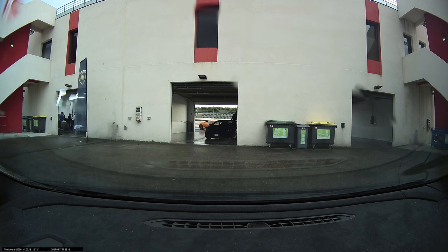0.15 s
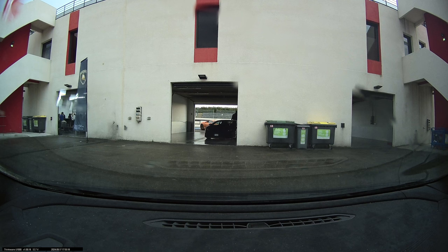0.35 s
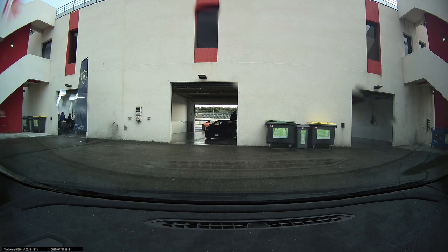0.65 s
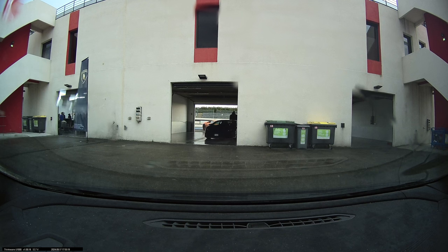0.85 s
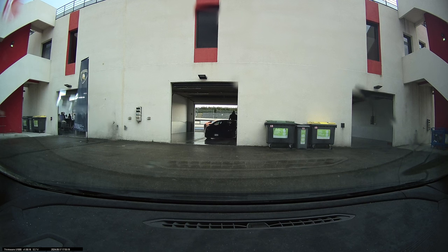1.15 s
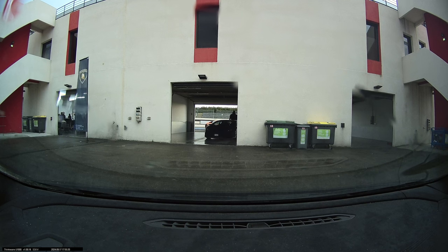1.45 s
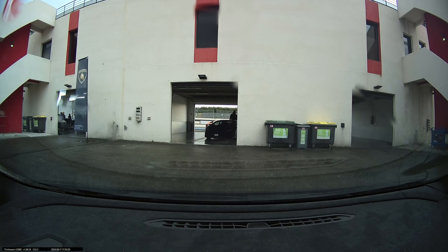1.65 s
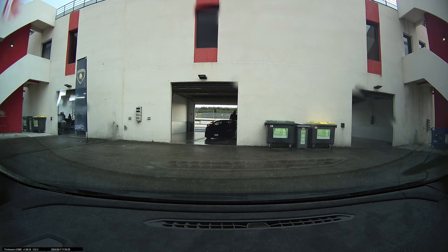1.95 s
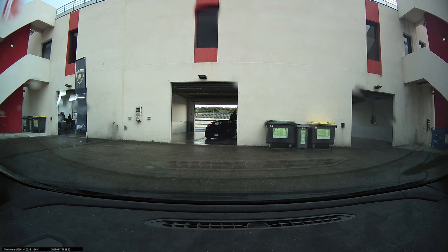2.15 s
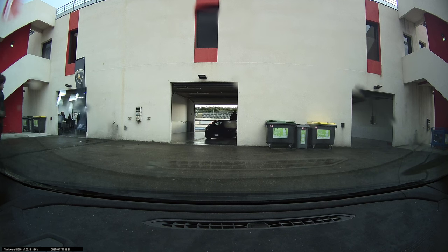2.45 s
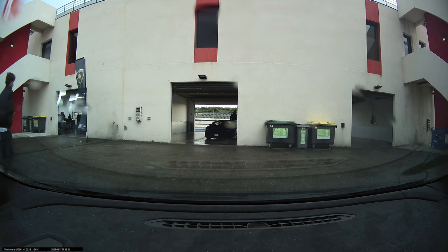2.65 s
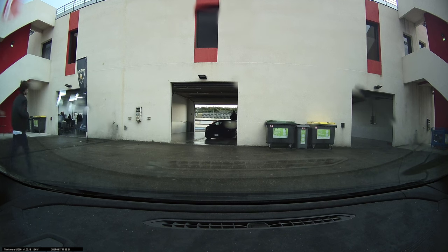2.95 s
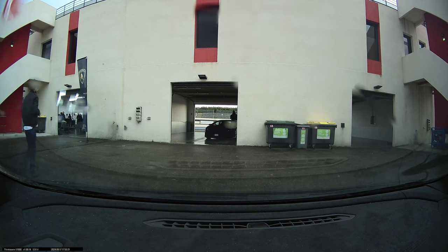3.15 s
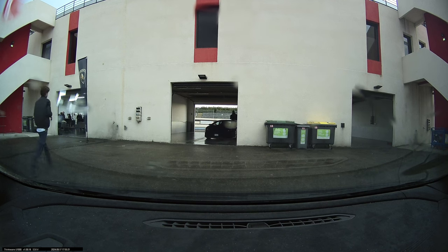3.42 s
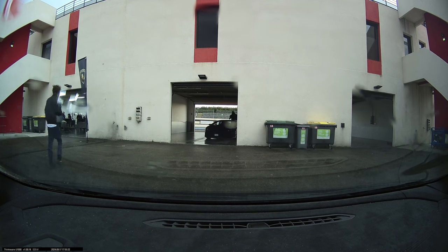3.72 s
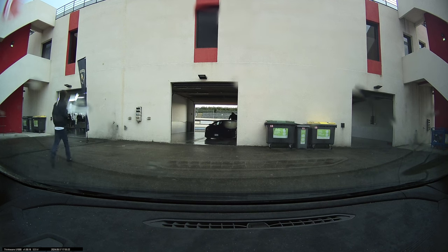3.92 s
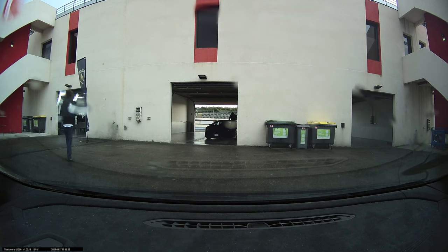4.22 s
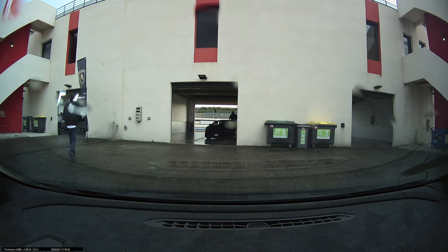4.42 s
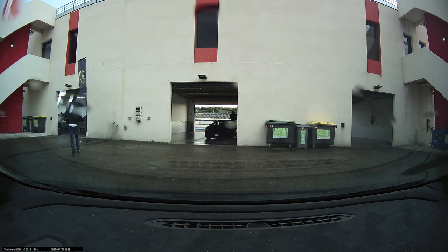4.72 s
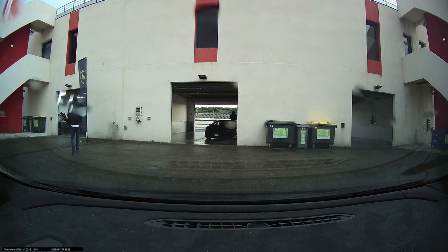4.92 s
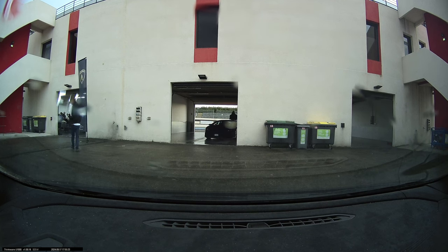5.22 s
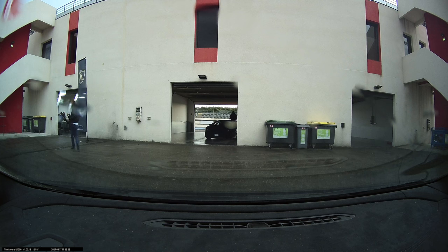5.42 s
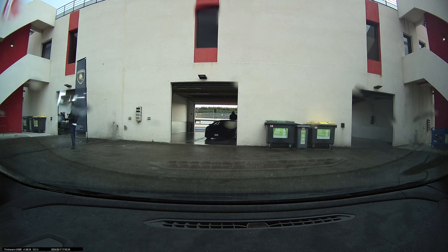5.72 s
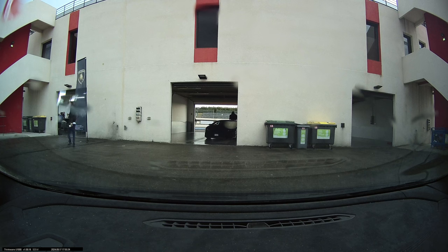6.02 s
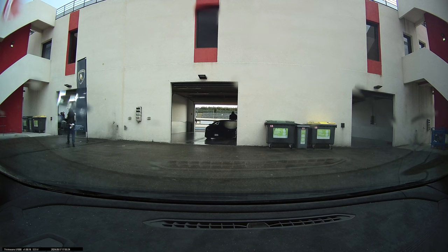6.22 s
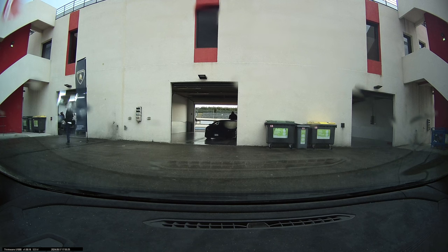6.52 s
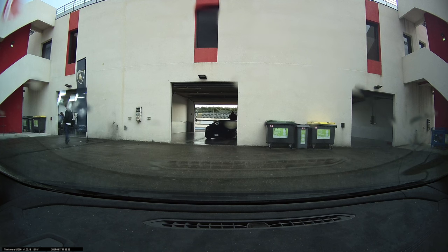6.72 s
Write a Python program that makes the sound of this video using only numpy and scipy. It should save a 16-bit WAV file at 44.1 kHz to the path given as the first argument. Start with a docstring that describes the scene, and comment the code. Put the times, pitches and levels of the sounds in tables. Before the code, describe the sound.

Close inside a parked car, with the microphone on the dashboard. Faint outside hum and light rain come first, with small body bumps. A brief hinge squeak leads into a massive, clipped door slam with rattles and low pressure throbs. Outside noise vanishes, a window motor grinds briefly, then rain ticks quietly until the locks thunk and a relay clicks in two pairs.

```python
"""A car door slams in light rain

Heard from the dashboard of a parked car: a door swings on a squeaking hinge, a gliding narrow band of noise, and slams.
The slam sets slow pressure waves ringing, which overload the microphone, and shaped noise makes the knocks and rattles.
Wavering tones and noise from outside fade as the door shuts, then a window motor grinds as uneven noise.
Later the locks thunk and a relay, a set of ringing tones, ticks twice over. Short noise ticks of rain fall throughout.
"""
import sys
import numpy as np
from scipy import signal
from scipy.fft import rfft, irfft, next_fast_len
from scipy.io import wavfile

SR = 44100
rng = np.random.default_rng(int(sys.argv[2]) if len(sys.argv) > 2 else 0)


def boost(x):
    """Linear amplitude factor 10**(x/20) for a level x in decibels (scalar or array-like)."""
    u = np.asarray(x, float) / 20
    return 10 ** u


def file_out(sig):
    """Save sig as 16-bit WAV at sys.argv[1]."""
    # one column per channel
    cols = np.atleast_2d(sig).T
    # limit, then scale
    lim = np.clip(cols, -1, 1)
    pcm = np.round(lim * 32767).astype(np.int16)
    wavfile.write(sys.argv[1], SR, pcm)


N = 302885
T = np.arange(N) / SR  # time of every sample, in seconds

# In all tables, "fade" is the time in which a sound dies away by 60 dB.
# A "colour" is the balance of a noise. Each row: frequency in Hz, relative level in dB.

# Booms of the car body when it is jolted. Each row: start in seconds, level in dB, fade in seconds.
BODY_JOLTS = [(.01, -47.5, 0.53), (.2, -51, 1), (.39, -48.5, 0.33), (0.614, -32, 0.31), (.69, -34.5, 0.34),
              (.83, -42, 0.34), (.95, -46.5, 1), (1.57, -33, .15), (1.645, -42.5, 0.68), (1.8, -41, 0.14),
              (1.925, -51.5, 0.32)]
# Colour of those booms.
BOOM_COLOUR = [(10, -31), (20, 11), (33, 11.5), (45, 5), (75, -21), (100, -67.5)]
# Colour of the closed cabin and microphone hiss.
FLOOR_COLOUR = [(12, -31.5), (20, 5), (53, -0.5), (197, -3.5), (260, -9.5), (537, -13), (635, -10.5),
                (710, -15), (992, -16.5), (1110, -21.5), (2360, -30), (3580, -31), (5290, -37.5),
                (12600, -40), (15700, -41)]
# Faint electronic whines that fade around the locking. Each row: time in seconds, level in dB.
WHINE_LEVEL = [(0, -93.5), (2.5, -93.5), (3.6, -92), (4.2, -105)]
# Swells of the outside hum. Each row: centre in seconds, half length in seconds, pitch in Hz, level in dB
# before the wavering.
HUM_SWELLS = [(0.11, .17, 208.7, -60), (0.364, 0.076, 207.6, -50.5), (0.498, 0.099, 209, -60),
              (0.847, .13, 212, -61), (1.06, .1, 212.3, -66), (3.401, .25, 233.9, -67)]
# Street noise through the open door. Each row: time in seconds, level in dB.
STREET_LEVEL = [(0.0, -64.5), (0.546, -69.5), (0.984, -73.5), (1.14, -88)]
# Colour of the street noise.
STREET_COLOUR = [(160, -29), (280, 5), (338, -12), (420, 1), (465, -6.5), (1020, -9.5), (2580, -23),
                 (3660, -20), (5340, -36), (9000, -37), (11700, -66.5), (19800, -120)]
# The larger raindrops. Each row: start in seconds, level in dB before each layer's own offset,
# glassy part in dB relative to that level.
LARGE_DROPS = [(0.357, -43.5, -33), (0.468, -56.5, -7), (0.614, -49.5, -6.5), (0.74, -49.5, -9),
               (0.812, -60, -12), (0.873, -53, -7), (1.079, -56, -8), (2.017, -46.5, -18),
               (2.042, -49, -18), (2.178, -50.5, -10.5), (2.254, -54, -18), (2.323, -51.5, -18),
               (2.544, -54.5, -7), (2.864, -43.5, -12), (2.983, -51, -11), (3.052, -53.5, -14),
               (3.075, -47, -25), (3.254, -51.5, -20), (3.304, -52.5, -9), (3.324, -53.5, -8),
               (3.359, -51, -28), (3.744, -52.5, -16), (3.774, -48.5, -11), (3.911, -48.5, -7.5),
               (3.99, -60, 0), (4.121, -61, -9), (4.148, -49.5, -5), (4.26, -53.5, -27.5),
               (4.424, -46.5, -18.5), (4.505, -56, -13), (4.66, -52, -20), (4.795, -50, -13),
               (4.898, -50.5, -7.5), (5.13, -49.5, -17), (5.154, -50, -10), (5.237, -57.5, -13),
               (5.303, -52, -19.5), (5.367, -51.5, -16.5), (5.439, -41.5, -8.5), (5.623, -50.5, -9),
               (5.642, -53, -2.5), (5.69, -55, -12), (5.849, -58.5, -30), (6.379, -53.5, -32.5),
               (6.841, -53.5, -7)]
# Colour of drops on the roof.
ROOF_COLOUR = [(180, -31.5), (300, -4), (857, 0), (1220, -1), (2690, -13.5), (3130, -17), (4610, -25.5),
               (7320, -29), (8160, -40.5), (10900, -41.5), (12000, -38), (15600, -84), (22000, -120)]
# Colour of drops on the glass.
GLASS_COLOUR = [(1500, -38.5), (2800, -14), (3600, 6), (5000, -7.5), (8000, -17), (11000, -41)]
# Colour of the trim, which rattles with the locks and relay and rings under the drops.
TRIM_COLOUR = [(240, -32.5), (400, -4.5), (563, -6.5), (850, -2), (1250, -9), (1460, -5), (1730, -11.5),
               (2270, -15), (2540, -22), (3240, -13.5), (4250, -30.5), (12000, -60), (15600, -89),
               (22000, -120)]
# Knocks of door, trim and lock. Each row: start in seconds, rattle level in dB, knock level in dB,
# thud level in dB, fade of the rattle in seconds.
KNOCK_EVENTS = [(0.64, -58, -50, -66, 0.21), (0.673, -55, -62, -48, 0.14), (1.1475, -43, -40, -68, 0.5),
                (1.198, -21, -45.5, -41.5, 0.11), (1.2443, -34.5, -27.5, -47, 0.02),
                (1.2551, -33, -27, -40, 0.046), (1.279, -45.5, -36, -25, 0.11),
                (1.33, -64, -58.5, -36, 0.3), (1.379, -58, -56, -44, 0.038),
                (1.4194, -48, -42.5, -42, 0.11), (1.483, -64, -60, -50, 0.077),
                (1.53, -63, -43.5, -43.5, 0.092), (1.583, -59, -53.5, -45, 0.19),
                (1.81, -62, -61.5, -45.5, 0.14), (3.640, -33, -33, -47.5, 0.12),
                (3.877, -51.5, -58.5, -71, 0.14), (3.957, -62, -52.5, -48, 0.5),
                (4.025, -57.5, -63, -41, 0.23), (4.064, -54, -40.5, -47, 0.089),
                (4.109, -68.5, -69, -48.5, 0.077), (5.926, -48.5, -54.5, -61, 0.11),
                (6.176, -51.5, -58, -65, 0.1)]
# Parts that slide before or between the knocks. Each row: start in seconds, level in dB, fade in seconds.
SLIDING_PARTS = [(0.339, -55.5, 0.22), (.626, -60, 0.19), (3.621, -47.5, .03), (3.811, -61.5, 0.13),
                 (6.128, -63, 0.086)]
# Colour of the door's rattles.
DOOR_COLOUR = [(240, -31), (400, -4), (481, -8), (900, -4.5), (1280, -18.5), (1640, -11.5), (2470, -27),
               (3380, -21.5), (4310, -44), (6890, -55), (12000, -66), (15600, -89), (22000, -120)]
# Colour of the knocks on the panels.
PANEL_COLOUR = [(120, -40), (190, 2), (280, 4), (380, -4), (520, -7), (700, -66)]
# Colour of the thuds.
THUD_COLOUR = [(40, -40), (65, -0.5), (90, -3.5), (135, -2), (200, -8), (280, -21), (400, -76.5)]
# Path of the hinge squeak. Each row: time in seconds, pitch in Hz, level in dB shared by its layers.
HINGE_SQUEAK = [(.88, 14050, -81), (.897, 11860, -75), (.907, 9000, -76), (.913, 8100, -66),
                (.958, 7500, -63.5), (.97, 6450, -60), (.982, 7800, -59), (1.022, 10800, -67.5),
                (1.035, 12900, -69), (1.05, 13100, -87)]
# Resonances of the door skin woken by the squeak. Each row: frequency in Hz, level in dB at the hardest rub.
DOOR_SKIN = [(3550, -60), (4900, -73), (7800, -72), (10500, -67), (11200, -79), (13500, -78)]
# Air and body modes (natural vibrations) of the cabin. Each row: frequency in Hz, fade in seconds.
CABIN_MODES = [(6.12, .16), (35.1, .17), (37.94, .77), (68.81, .17)]
# The slam, its rebound off the seal and its settling. Each row: start in seconds, then the signed push into
# each of the four cabin modes, where 1 is full scale.
SLAM_BLOWS = [(1.1988, 6.57, 1.41, .08, -1.33), (1.2622, -2.1, -.52, -.19, -.53),
              (1.2854, 1.12, .84, .04, -.21)]
# Colour of the latch striking home.
LATCH_COLOUR = [(710, -29.5), (1200, 0), (3110, 1), (4180, -33.5), (5000, -15.5), (6940, -26), (15000, -51)]
# Load on the window motor. Each row: time in seconds, level in dB of its grinding.
MOTOR_LOAD = [(1.47, -67), (1.526, -58), (1.598, -59.5), (1.686, -49.5), (1.73, -57.5), (1.79, -54),
              (1.845, -58), (1.92, -73)]
# Colour of the motor.
MOTOR_COLOUR = [(180, -36.5), (300, -16), (410, -1), (466, -10), (569, -1.5), (638, -7.5), (801, -2),
                (1230, -9), (1340, -3), (1850, -17), (3520, -23), (5320, -35.5), (9000, -43), (11700, -81),
                (19800, -120)]
# The relay closes and opens in turn. Each row: start in seconds, level in dB before each layer's own offset.
RELAY_TICKS = [(3.846, -31.5), (4.032, -31), (6.048, -32), (6.235, -31.5)]
# Modes of the relay housing. Each row: frequency in Hz, relative level in dB on closing,
# relative level in dB on opening, fade in seconds.
RELAY_HOUSING = [(554, -0.5, -0.5, 0.043), (817, -7, 9, 0.065), (1287, 10, 3.5, 0.045),
                 (2384, -11.5, -29, 0.07), (2645, -13, -5, 0.059), (3600, -7, -41, 0.072),
                 (4800, -22, -27, 0.048)]

JOLT_RISE_S = 0.054
WHINE_SAG_HZ_PER_S = 66
PATTER_PER_S = 70  # small raindrops
PATTER_OPEN_DB, PATTER_SHUT_DB = -63, -68  # base level of small drops with the window open and shut
FLURRY_DB = 3.5  # how strongly the small drops come in flurries
# A knock of HARD_DB rises in HARD_RISE_S; the rise time grows by SOFTEN dB per dB weaker.
HARD_RISE_S, HARD_DB, SOFTEN = 0.0013, -30, 0.27
SCRAPE_RISE_S = 0.013
LOCKING_S = 3  # the door rattles before this time, the locks after
RUB_S, RUB_HALF_S = 0.962, 0.018  # the hardest rub of the hinge and its half length
NEAR_HZ, NEAR_DB = 500, -1  # a skin mode also answers when the squeak passes this near
OVERLOAD = 0.4855  # microphone limit, where 1 is full scale


def unit(x):
    """Scale to an rms (average strength) of 1."""
    return x / np.sqrt(np.mean(x ** 2) + 1e-20)


def curves(rows):
    """One value per sample for each column after the time; the last, a level, fades out beyond the rows."""
    s, *columns = np.transpose(rows)
    beyond_s = np.maximum(s[0] - T, 0) + np.maximum(T - s[-1], 0)
    *rest, db = [np.interp(T, s, column) for column in columns]
    return [*rest, np.maximum(db - 500 * beyond_s, -200)]


def wobble(rate, count=N):
    """A smooth random curve of count samples, with rate random knots a second, eased from knot to knot."""
    knot, part = np.divmod(T[:count] * rate, 1)
    knots = rng.standard_normal(int(count * rate / SR) + 2)
    eased = part * part * (3 - 2 * part)
    return np.interp(knot + eased, np.arange(len(knots)), knots)


def noise(colour):
    """Noise of rms 1 whose frequencies are balanced by a colour."""
    size = next_fast_len(N)
    hz, db = np.transpose(colour)
    bins_hz = np.fft.rfftfreq(size, 1 / SR)
    gain = boost(np.interp(np.log(bins_hz + 1), np.log(hz + 1), db))
    return unit(irfft(rfft(rng.standard_normal(size)) * gain, size)[:N])


def ragged(hz, width_hz, count=N):
    """A narrow band of noise around a fixed or moving pitch, made by two randomly wobbling waves."""
    turn = 2 * np.pi * np.cumsum(hz + np.zeros(count)) / SR
    return wobble(width_hz, count) * np.sin(turn) + wobble(width_hz, count) * np.cos(turn)


def bursts(s, db, rise, hold, t60):
    """Loudness outline of events that swell, hold and die away; where they overlap, their powers add."""
    power = np.zeros(N + 2 * SR)
    for start, level, up, flat, down in np.broadcast(s, db, rise, hold, t60):
        t = np.arange(round((up + flat + down) * SR)) / SR
        fading = boost(level - 60 * np.maximum(t - up - flat, 0) / down)
        shape = fading * np.minimum(t / up, 1)
        power[round(start * SR):][:len(t)] += shape ** 2
    return np.sqrt(power[:N])


def background():
    """The body booms when shaken, over faint whines, a quiet noise floor and a slow pressure drift."""
    s, db, t60 = np.transpose(BODY_JOLTS)
    boom = bursts(s, db, JOLT_RISE_S, 0.01, t60) * noise(BOOM_COLOUR)
    sagging = boost(2.5 * wobble(3)) * ragged(8700 - WHINE_SAG_HZ_PER_S * T, 700)
    steady = 0.9 * ragged(11000, 1200) + 0.87 * ragged(15000, 900)
    whine = boost(curves(WHINE_LEVEL)[0]) * (sagging + steady)
    whine = whine + boost(-94) * ragged(19000, 1200)  # this highest one does not fade
    floor = boost(-64 + 0.8 * wobble(7.6)) * noise(FLOOR_COLOUR)
    drift = boost(-65.5) * wobble(0.64)
    return boom + whine + floor + drift


def outside():
    """A wavering hum with a weak octave, and street noise, fade as the door closes; a fainter hum returns."""
    s, half_s, hz, db = np.transpose(HUM_SWELLS)
    power = sum(boost(2 * d) * np.exp(-2 * ((T - c) / h) ** 2) for c, h, d in zip(s, half_s, db))
    pitch_hz = np.interp(T, s, hz) * (1 + 0.009 * wobble(16))
    turn = 2 * np.pi * np.cumsum(pitch_hz) / SR
    tone = np.sin(turn) + 0.21 * wobble(11) * np.sin(2 * turn)
    hum = np.sqrt(power) * boost(4.4 * wobble(19)) * tone
    return hum + boost(curves(STREET_LEVEL)[0]) * noise(STREET_COLOUR)


def rain():
    """Drops tick on the roof or thinly on the glass, with a short ring of the trim; small ones fall at random."""
    chance = rng.random((round(PATTER_PER_S * N / SR), 3))
    small_s = chance[:, 0] * N / SR
    window_shut_s = MOTOR_LOAD[-1][0]
    small_db = np.where(small_s < window_shut_s, PATTER_OPEN_DB, PATTER_SHUT_DB)
    small_db = small_db + FLURRY_DB * wobble(10)[(chance[:, 0] * N).astype(int)]
    small_db = small_db - 3.0 * np.log(chance[:, 1])  # a few fall much harder than the rest
    s, db, glassy_db = np.transpose(LARGE_DROPS)
    s, db = np.r_[s, small_s], np.r_[db, small_db]
    glassy_db = np.r_[glassy_db, -22 + 18 * chance[:, 2]]
    roof = bursts(s, db - 5, 0.001, 0.0007, 0.016) * noise(ROOF_COLOUR)
    glass = bursts(s, db + glassy_db - 7, 0.00061, 0.00099, 0.022) * noise(GLASS_COLOUR)
    ring = bursts(s, db - 16.5, 0.003, 0.0072, 0.085) * noise(TRIM_COLOUR)
    return roof + glass + ring


def knocks():
    """A grainy rattle, plus a panel knock and a deep thud that last longer; harder blows rise faster."""
    s, rattle_db, knock_db, thud_db, t60 = np.transpose(KNOCK_EVENTS)
    rattle = np.where(T < LOCKING_S, noise(DOOR_COLOUR), noise(TRIM_COLOUR))
    rattle = unit(boost(2.5 * wobble(300)) * rattle)
    rise = HARD_RISE_S * boost(SOFTEN * (HARD_DB - rattle_db))
    hold = 0.096 * t60
    struck = bursts(s, rattle_db, rise, hold, t60)
    slide_s, slide_db, slide_t60 = np.transpose(SLIDING_PARTS)
    sliding = bursts(slide_s, slide_db, SCRAPE_RISE_S, 0.082 * slide_t60, slide_t60)
    knock = bursts(s, knock_db, rise, hold, 1.6 * t60) * noise(PANEL_COLOUR)
    thud = bursts(s, thud_db, rise, hold, 1.4 * t60) * noise(THUD_COLOUR)
    return np.hypot(struck, sliding) * rattle + knock + thud


def hinge():
    """A rough gliding squeak with a broad halo and a breath of hiss wakes fixed resonances of the door skin."""
    n = round(SLAM_BLOWS[0][0] * SR)  # it ends before the door is shut
    hz, db = np.array(curves(HINGE_SQUEAK))[:, :n]
    rub = np.exp(-((T[:n] - RUB_S) / RUB_HALF_S) ** 2)
    skin = 0
    for mode_hz, mode_db in DOOR_SKIN:
        passing = boost(db + NEAR_DB) * np.exp(-((hz - mode_hz) / NEAR_HZ) ** 2)
        skin = skin + (boost(mode_db) * rub + passing) * ragged(mode_hz, 570, n)
    hiss = 0.5 * noise([(1500, -6.0), (3000, 0.5), (11000, -14), (15500, -7), (16000, -38.5)])[:n]
    rough = boost(3.1 * wobble(119.7, n)) * ragged(hz, 540, n)
    halo = 0.56 * ragged(1.06 * hz, 3000, n)
    squeak = boost(db) * (rough + halo + hiss)
    return np.pad(squeak + skin, (0, N - n))


def cabin_pressure():
    """The swinging door piles up pressure ever faster; each blow then sets the cabin modes ringing."""
    shut_s = SLAM_BLOWS[0][0]
    pile_up = -0.018 * np.clip((T - 0.9924) / 0.1, 0, 3) ** 5.587
    pressure = pile_up * np.exp(-np.maximum(T - shut_s, 0) / 0.001)  # let go once the door is shut
    pressure[T > shut_s + 0.05] = 0
    for s, *pushes in SLAM_BLOWS:
        age = np.maximum(T - s, 0)
        for push, (hz, t60) in zip(pushes, CABIN_MODES):
            pressure = pressure + push * boost(-60 * age / t60) * np.sin(2 * np.pi * hz * age)
    return pressure


def latch():
    """The latch cracks as the door strikes home: one short burst of coloured noise."""
    return bursts([SLAM_BLOWS[0][0]], -25.5, 0.00099, 0.004, 0.086) * noise(LATCH_COLOUR)


def motor():
    """The window glass grinds up its rail in uneven strokes of noise; the gear sings faintly."""
    grind = unit(boost(1.06 * wobble(99) + 3.0 * wobble(30)) * noise(MOTOR_COLOUR))
    gear = 0.31 * boost(3.0 * wobble(11.47)) * ragged(1390, 70)
    return boost(curves(MOTOR_LOAD)[0]) * (grind + gear)


def relay():
    """The contact rings one housing, higher on closing; chatter roughens the ring and rattles the trim."""
    out, t = np.zeros(N + SR), np.arange(SR // 4) / SR
    for k, (s, db) in enumerate(RELAY_TICKS):
        ring = 0
        for hz, *levels, t60 in RELAY_HOUSING:
            chatter = 0.65 * signal.resample(rng.standard_normal(60), len(t))
            fading = boost(levels[k % 2] - 60 * t / t60)  # even ticks close, odd ticks open
            swell = 1 - np.exp(-t * 1200 / hz / 0.00082)  # the higher modes swell in later
            ring = ring + fading * np.sin(2 * np.pi * hz * t + chatter) * swell
        out[round(s * SR):][:len(t)] += boost(db - 14.5) * ring
    s, db = np.transpose(RELAY_TICKS)
    return out[:N] + bursts(s, db - 23.0, 0.0014, 0.0027, 0.16) * noise(TRIM_COLOUR)


def scene():
    """All sources add up at one microphone."""
    mix = background() + outside() + rain() + knocks() + hinge()
    mix = mix + cabin_pressure() + latch() + motor() + relay()
    return mix[None]


def low_pass(x):
    """Removes everything above the highest recorded frequency."""
    return signal.sosfilt(signal.butter(12, 15840, fs=SR, output="sos"), x)


def record(dry):
    """The microphone's input stage clips flat whatever exceeds its limit, as under the slam."""
    clipped = np.clip(dry, -OVERLOAD, OVERLOAD)
    return low_pass(clipped)


dry = scene()
out = record(dry)
file_out(out)
```